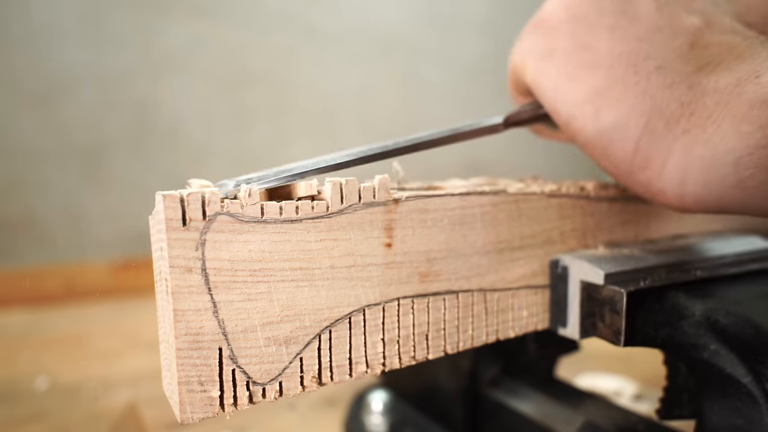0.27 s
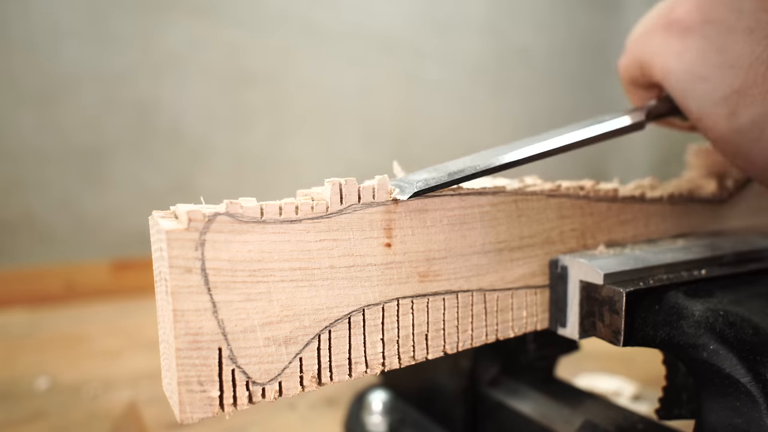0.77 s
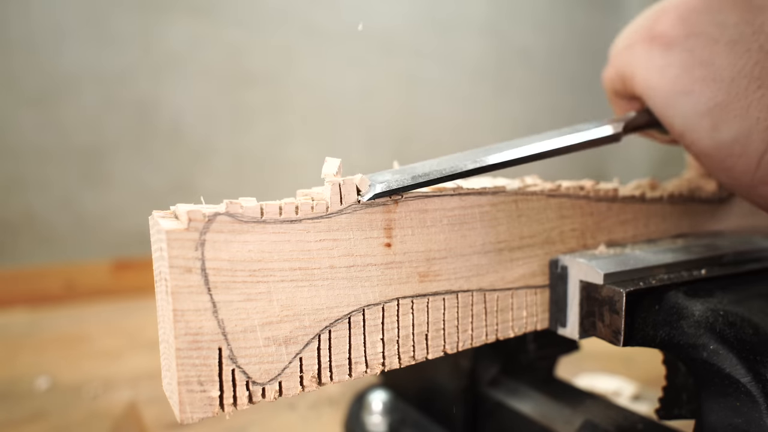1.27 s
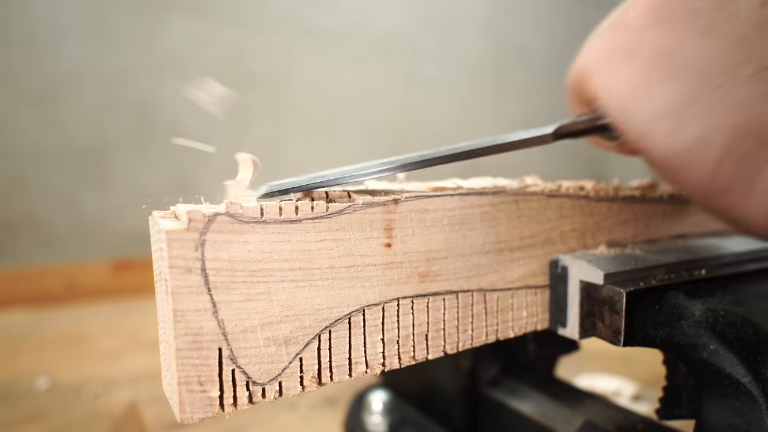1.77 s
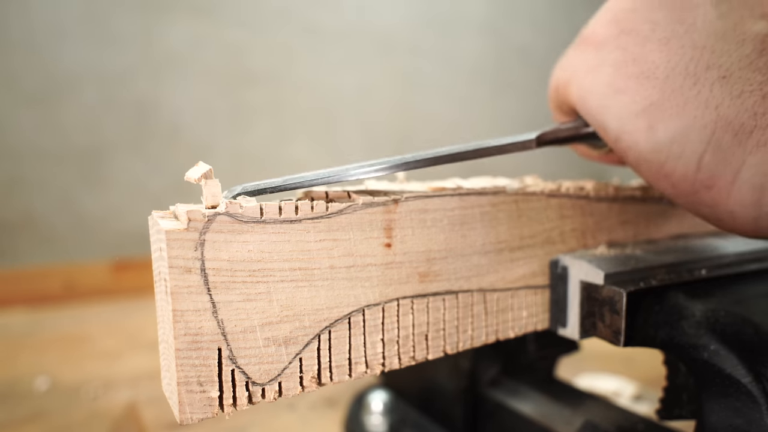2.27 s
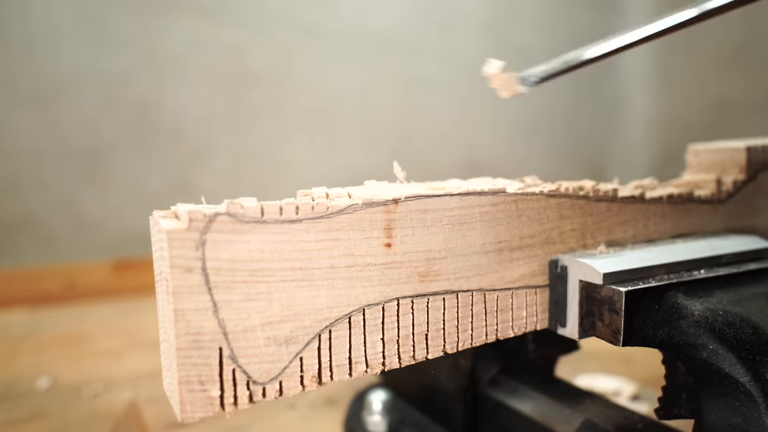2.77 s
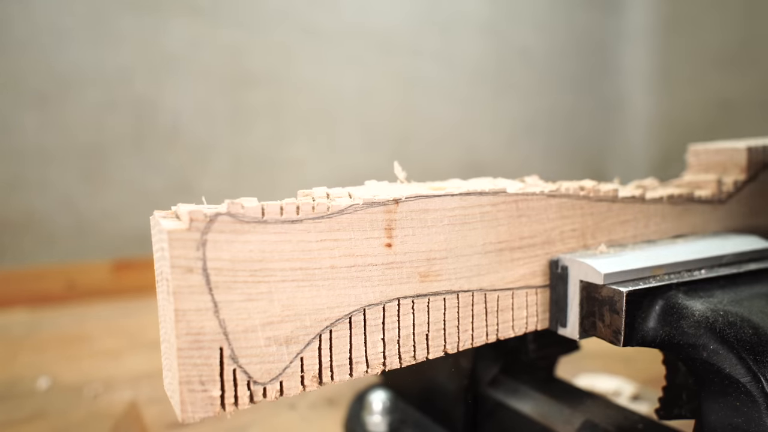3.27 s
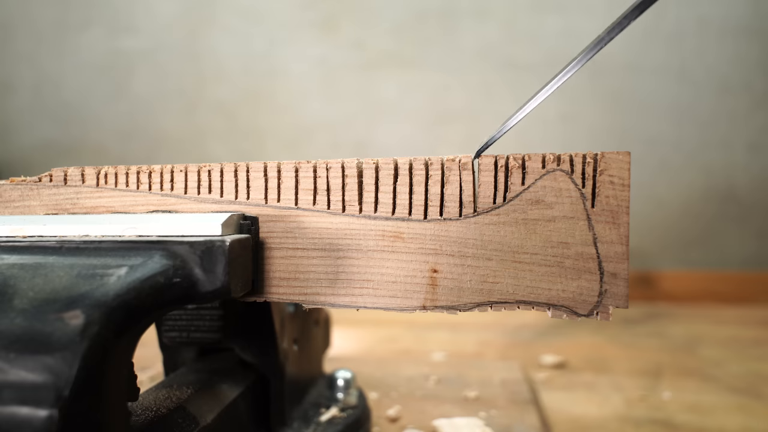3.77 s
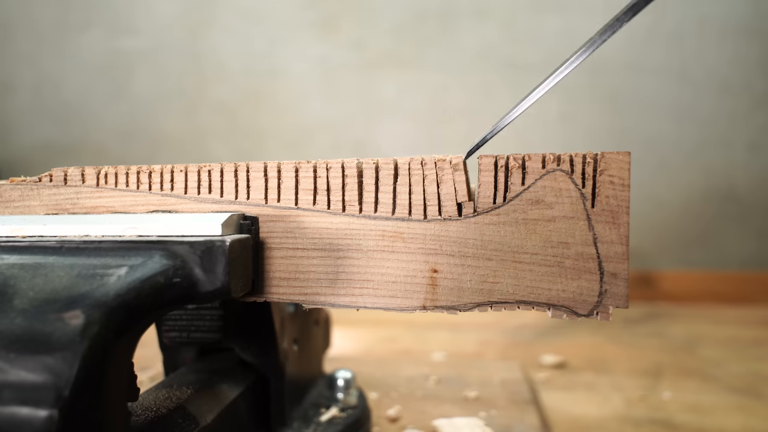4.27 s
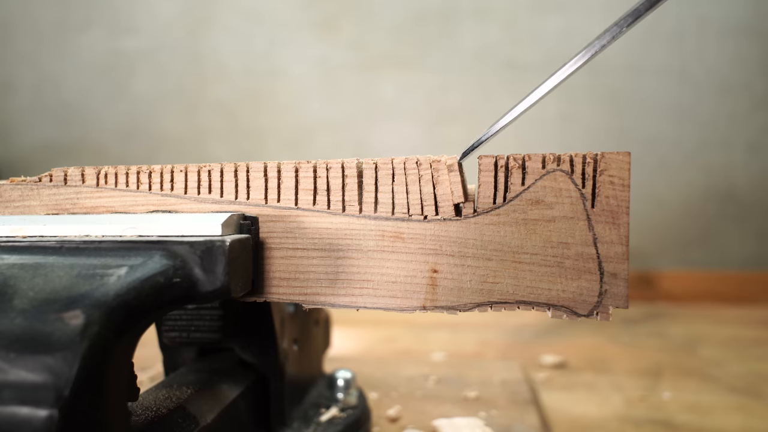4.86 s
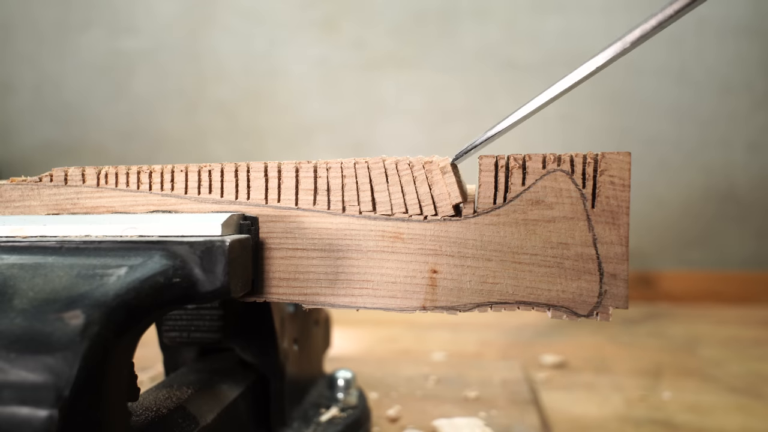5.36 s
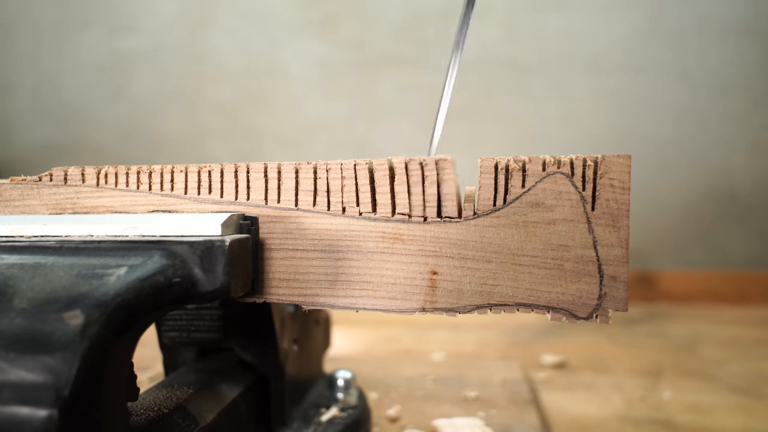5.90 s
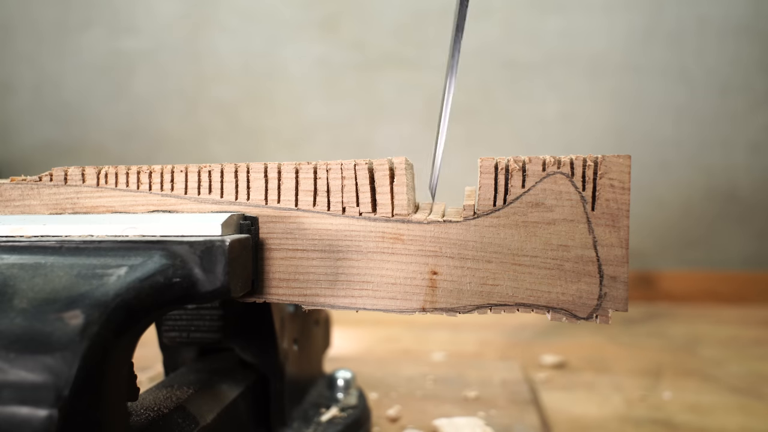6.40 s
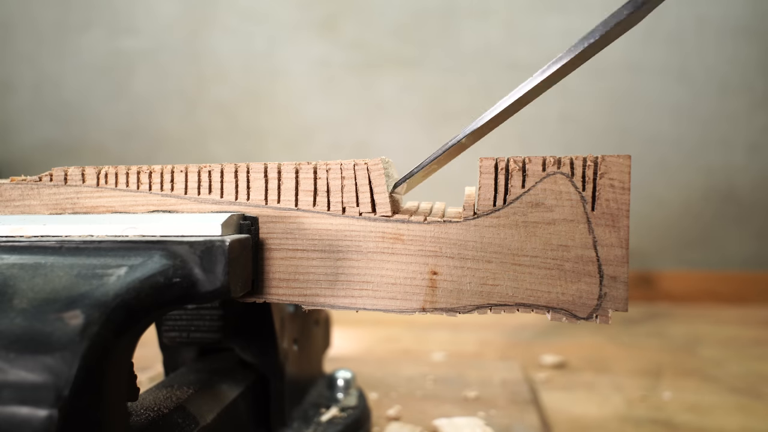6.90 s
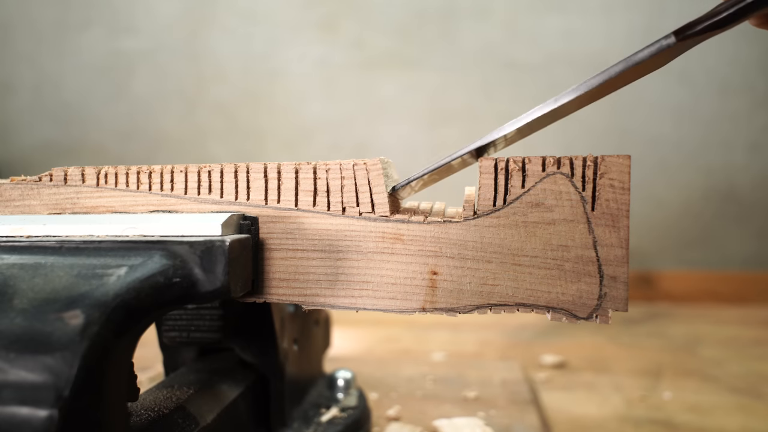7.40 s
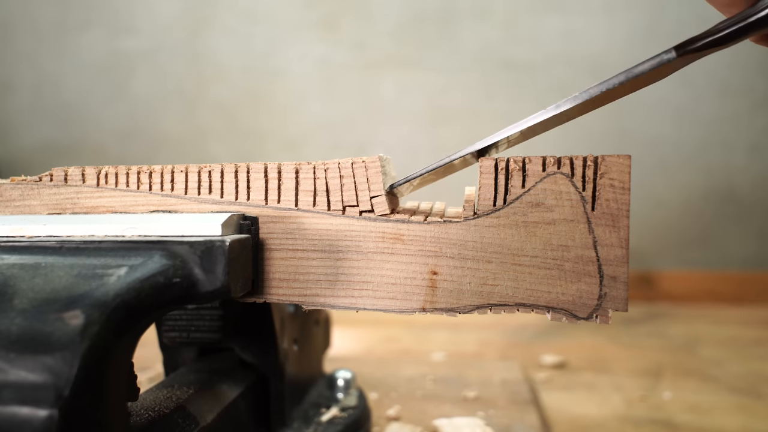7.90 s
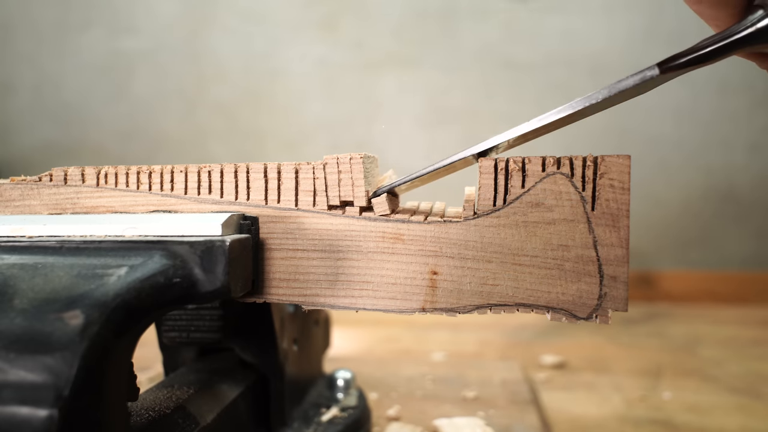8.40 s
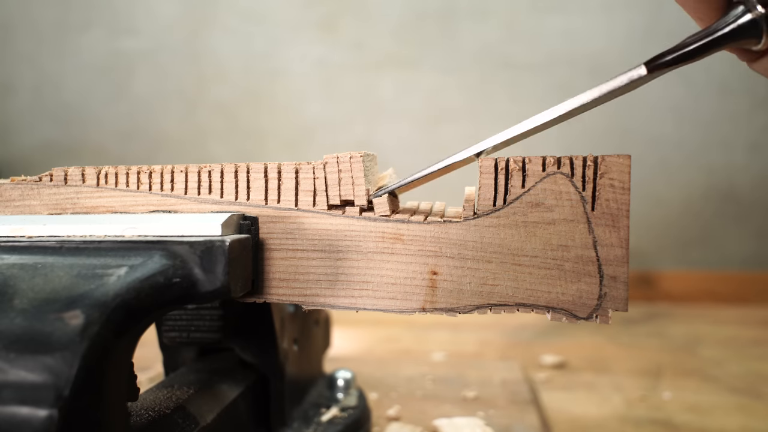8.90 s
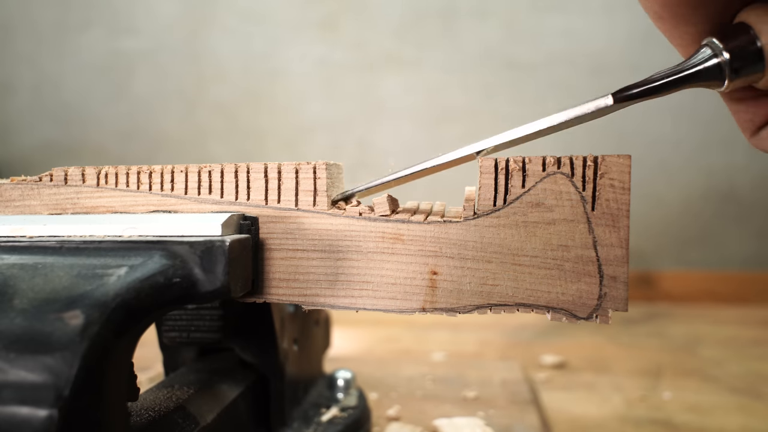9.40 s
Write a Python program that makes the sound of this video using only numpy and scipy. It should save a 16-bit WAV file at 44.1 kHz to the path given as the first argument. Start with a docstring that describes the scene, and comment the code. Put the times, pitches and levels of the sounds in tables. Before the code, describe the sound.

In a quiet workshop, brief scrapes of a blade on wood lead into five evenly spaced hammer blows on a chisel. After a pause, seven brighter blows follow, then loud snapping chips and gritty prying, then eight final blows. Each strike cracks sharply, splits fibres, rings briefly and booms through the bench. The close microphone overloads on the peaks.

```python
"""Chiselling at the bench vise

Over low workshop air, a blade pries and scrapes (rough noise) and chips snap off (short bursts with a pitch).
Then a steel hammer drives a chisel through the sawn teeth of a wooden blank, in three quick runs.
Each blow layers a crack, splitting fibres, ringing steel, a booming bench and a diffuse room tail.
The close microphone overloads: whatever goes beyond full scale is clipped flat."""
import sys
import numpy as np
from scipy import signal
from scipy.fft import rfft, irfft, next_fast_len
from scipy.io import wavfile
from scipy.ndimage import map_coordinates

SR = 44100
rng = np.random.default_rng(int(sys.argv[2]) if len(sys.argv) > 2 else 0)


def bounce(signal):
    """Save signal as a 16-bit WAV file at the path given by the first command-line argument."""
    frames = np.transpose(np.atleast_2d(signal))
    limited = np.clip(frames, -1, 1)
    pcm = np.round(limited * 32767).astype(np.int16)
    wavfile.write(sys.argv[1], SR, pcm)


N = 425565
# the time base of one sound event, three quarters of a second
T = np.arange(SR * 3 // 4) / SR

# workshop air spectrum: f/Hz, density/dB
AIR_SPECTRUM = [(12, -32.5), (20, -2.5), (58, 2.5), (138, -17.5), (222, -16.5), (718, -27.5), (873, -24),
                (1000, -27), (16000, -42.5)]
# workshop reverberation: f/Hz, t60/s
ROOM_DECAY = [(60, 0.54), (250, 0.34), (800, .28), (3000, 0.32), (6000, 0.34), (13000, .22)]
# moments at which every sound but the air is cut off: t/s
CUTOFFS = [0.515, 6.94]

# blade and loose chips scraping along the sawn teeth, levels before each layer's trim:
# t/s, length/s, rasp/dB, hiss/dB, rumble of the blank/dB
SCRAPES = [(0.0, 0.011, -33, -39, -36), (0.047, 0.023, -34.5, -38, -41), (0.169, 0.036, -36.5, -38, -39),
           (0.276, 0.15, -39.5, -47.5, -35.5), (0.495, 0.008, -39, -50, -28.5),
           (2.105, 0.04, -38.5, -43.5, -54), (2.199, 0.26, -60, -62.5, -57.5),
           (2.503, 0.048, -53.5, -60, -66), (5.989, 0.065, -52, -61, -28), (6.39, 0.037, -23, -22.5, -25.5),
           (6.575, 0.068, -36.5, -48, -29.5), (6.748, 0.042, -27, -45, -45),
           (6.768, 0.041, -24.5, -54, -35), (6.84, 0.031, -18.5, -27, -36), (9.031, 0.031, -20, -17, -33)]
# spectra of the scrape layers: f/Hz, density/dB
RASP_SPECTRUM = [(200, -31), (600, -7.5), (900, -2), (1500, 2), (3200, 0.5), (5500, -20), (10000, -25),
                 (16000, -79.5)]
HISS_SPECTRUM = [(1000, -49.5), (4000, 8), (6500, 0.5), (10000, -15.5), (16000, -26)]
RUMBLE_SPECTRUM = [(40, 8.5), (100, 2.5), (150, 6.5), (200, -3.5), (320, -0.5), (500, -2), (750, -19),
                   (2000, -35)]

# chips snapping off under the prying blade; knock is relative to level, treble is a shelf boost:
# t/s, level/dB, knock/dB, treble/dB, pitch f/Hz
CHIPS = [(0.048, -16.5, -42.5, -15, 1850), (0.17, -33.5, -1, 17.5, 9200), (2.087, -33, -45, -18, 3900),
         (2.201, -32, -41, 1.5, 1164), (2.507, -42, -25, -28, 6760), (2.893, -46.5, -30.5, -25, 3470),
         (5.968, -21.5, -38, -28, 2940), (5.993, -20, -5.5, -13, 1024), (6.04, -4.5, -24.5, -8, 2860),
         (6.047, -7, -28.5, -14, 3140), (6.175, -4, -25, -34, 3110), (6.242, -9, -31, 10, 6600),
         (6.393, -7, -42, -9, 2970), (6.584, -4, -33, -4.5, 3900), (6.772, -8.5, -36, -25, 2130),
         (6.901, -13.5, -40, 3.5, 3340)]
# chip colour: f/Hz, density/dB
CHIP_SPECTRUM = [(100, -24), (600, -9), (1400, -4.5), (3200, -1), (6000, 1.5), (10000, -6.5), (16000, -15)]
# dull taps as tool and loose chips settle after a blow: t/s
TAPS = [5.546, 5.931, 7.707, 8.268, 8.585]
# modes of the blank when it is knocked: f/Hz, level/dB, t60/s
BLANK_MODES = [(146, -6.5, 0.37), (306.8, -2, 0.1), (474, -2.5, 0.16), (547, -8.5, 0.1), (558, -7.5, 0.17)]

# hammer blows; treble is a shelf boost on the splintering, ring is relative to level:
# t/s, level/dB, splinter treble/dB, chisel ring/dB, strongest ring f/Hz
BLOWS = [(0.6064, -27, -10.5, -15.5, 3430), (0.9032, -22.5, -5.5, -6.5, 6620),
         (1.2035, -26.5, -3, -12.5, 1860), (1.5062, -23.5, -3.5, -13, 3120), (1.8109, -28, -19.5, 5, 4600),
         (3.6825, -27.5, 6.5, -7, 4720), (4.0258, -21, 8, -11.5, 4400), (4.3622, -23, 4, -14, 2120),
         (4.688, -25.5, 7, -13.5, 2060), (5.0191, -22, 3.5, -17.5, 4460), (5.3648, -21.5, -5, -9, 4520),
         (5.713, -20.5, -3.5, -10, 3030), (7.1574, -25, -10, -11.5, 3360), (7.4639, -24, -5.5, -20.5, 3810),
         (7.7756, -19, 4.5, -15.5, 6650), (8.095, -18, -2.5, -25.5, 4220), (8.3978, -21.5, 0.5, -10, 2760),
         (8.74, -25, -9.5, -14, 4350), (9.0544, -22, 5.5, -13.5, 2960), (9.3744, -20.5, -5, -7, 3080)]
# splintering wood: f/Hz, density/dB
SPLINTER_SPECTRUM = [(30, -19.5), (150, 1), (450, 6), (750, 3.5), (1400, 1.5), (2200, 2), (3000, 0.5),
                     (5000, -5.5), (7000, -10.5), (10000, -15.5), (16000, -22)]
# the chisel's modes: f/Hz, width/Hz, level/dB
CHISEL_MODES = [(1440, 37, 11.5), (3110, 130, 14), (4640, 300, 10), (6470, 200, 8.5), (8700, 230, 11.5)]
# modes of bench and vise: f/Hz, t60/s, level/dB as first clamped, level/dB with the blank turned round
BENCH_MODES = [(55, 0.41, -3.5, 2), (71.7, 0.32, 6.5, 2.5), (101, 0.33, -3.5, -2.5), (117, 0.24, -10, -0.5),
               (143.3, 0.23, 8.5, -1), (172, 0.12, -10, 2.5), (221, 0.16, -8.5, 7), (299.5, 0.24, -7.5, -5),
               (429.3, 0.33, 1.5, -2.5), (459.5, 0.28, -5.5, -5), (512, 0.33, -21, -6),
               (603, 0.16, -15.5, -18.5)]

# every stroke bites at once, eases off and lets go; the blank follows more slowly
BITE_S, EASE_DB_PER_S, RELEASE_T60_S = 0.001, 35.5, 0.12
RUMBLE_RISE_S, RUMBLE_T60_S = 0.019, 0.44
TAP_DB, TAP_KNOCK_DB, TAP_TREBLE_DB, TAP_HZ = -21.5, -25.5, -43.5, 1175
# the blank is turned round in the vise at this time
TURNED_S = 3.4
# the crack is low as the blank is first clamped, and higher once it is turned round
CRACK_HZ, TURNED_CRACK_HZ, CRACK_SPREAD = 1160, 2747, 0.1
# a tooth splits a moment after the edge bites, later under a weak blow (s, log share per dB, log spread)
SPLIT_S, SPLIT_PER_DB, SPLIT_SPREAD = 0.0038, 0.12, 0.16
# bench and vise take up a usual blow at these levels, and only a share of each dB beyond it
USUAL_DB, BENCH_SHARE = -23.5, 0.34
THUMP_DB, TURNED_THUMP_DB, KNOCK_DB, TURNED_KNOCK_DB = -16, -14.5, -15, -19
# the band limit of the finished sound
TOP_HZ = 16100


def amp(db):
    """Decibels to gain."""
    return 10 ** (np.asarray(db) / 20)


def unit(x):
    """x at rms 1."""
    return x / np.sqrt(np.mean(x ** 2) + 1e-20)


def along(points, hz):
    """A table of frequency and value, read on a log frequency axis."""
    f, v = np.transpose(points)
    return np.interp(np.log(hz + 1), np.log(f + 1), v)


def filtered(x, gain):
    """x shaped by a gain that depends on frequency."""
    padded = next_fast_len(len(x) + 8192)
    spectrum = rfft(x, padded) * gain(np.fft.rfftfreq(padded, 1 / SR))
    return irfft(spectrum, padded)[:len(x)]


def shelf(hz, corner_hz):
    """0 below the corner, 1 above it."""
    return hz ** 4 / (hz ** 4 + corner_hz ** 4)


def bump(hz, centre, width):
    """The power shape of a resonance, 1 at its centre."""
    return 1 / (1 + (2 * (hz - centre) / width) ** 2)


def wobble(x):
    """A random curve of straight lines, with one knot for each unit of x."""
    return map_coordinates(rng.standard_normal(int(x[-1]) + 2), [x], order=1)


def fade(t60):
    """An exponential decay, 60 dB down after t60 seconds."""
    return np.exp(-np.log(1000) * T / max(t60, 1e-4))


def ring(hz, t60):
    """One struck mode: a dying sine."""
    return np.sin(2 * np.pi * hz * T) * fade(t60)


def noise(spectrum, size):
    """Coloured noise of rms 1."""
    return unit(filtered(rng.standard_normal(size), lambda hz: amp(along(spectrum, hz))))


def burst(t60, clump_db=4, clump_rate=1400):
    """A dying burst of tiny fractures that come in clumps, white in colour."""
    clumps = amp(clump_db * wobble(T * clump_rate))
    return unit(clumps * rng.standard_normal(len(T))) * fade(t60)


def add(track, s, sound):
    """Lay a sound into the track from time s, up to the next cutoff."""
    start = max(round(s * SR), 0)
    later_cutoffs = [round(cutoff * SR) for cutoff in CUTOFFS if cutoff > s]
    end = min(later_cutoffs + [N, start + len(sound)])
    track[start:end] += sound[:end - start]


def workshop_air():
    """The workshop's low, quiet air: steady coloured noise."""
    return amp(-60.5) * noise(AIR_SPECTRUM, N)


def workshop(build_s=0.0059):
    """The room's answer to a click, of unit energy: a new diffuse tail that builds up, then dies by pitch."""
    hz, t, z = signal.stft(rng.standard_normal(len(T)), SR, nperseg=256)
    decay = np.exp(-np.log(1000) * t / along(ROOM_DECAY, hz)[:, None])
    tail = signal.istft(z * decay, SR, nperseg=256)[1][:len(T)]
    # the tail builds up as the walls are reached
    tail = tail * (1 - np.exp(-T / build_s))
    return tail / np.linalg.norm(tail)


def stroke(length, rise, t60):
    """The pressure of one stroke: it rises, eases off while it is held, and dies away."""
    held = amp(-EASE_DB_PER_S * T) * (1 - np.exp(-T / max(rise, 1e-4)))
    return held * np.exp(-np.log(1000) * np.maximum(T - length, 0) / max(t60, 1e-4))


def crumbs(rate=70, spread_db=4):
    """Sparse clicks of uneven size as fibres break off under the edge, white in colour."""
    return (rng.random(len(T)) < rate / SR) * amp(spread_db * rng.standard_normal(len(T)))


def scraping(rasp_db=-5, hiss_db=-6, rumble_db=-1, catch_db=5, catch_rate=450, room_db=-3, teeth_db=3.5,
             crumb_db=14):
    """The edge catches and slips on the fibres hundreds of times a second, and the blank rumbles under it."""
    track = np.zeros(N)
    for s, length, rasp, hiss, rumble in SCRAPES:
        catches = unit(amp(catch_db * wobble(T * catch_rate)))
        rasping = amp(rasp + rasp_db) * noise(RASP_SPECTRUM, len(T))
        hissing = amp(hiss + hiss_db) * noise(HISS_SPECTRUM, len(T))
        rub = catches * (rasping + hissing) + amp(hiss + crumb_db) * crumbs()
        rub = stroke(length, BITE_S, RELEASE_T60_S) * rub
        # the teeth under the edge resonate, and the colour shifts as it passes from one to the next
        here, there = [filtered(rub, lambda hz: amp(teeth_db * wobble(hz / 150))) for _ in range(2)]
        share = (1 + np.tanh(2 * wobble(T * 18))) / 2
        rub = share * here + (1 - share) * there
        echo = signal.fftconvolve(rub, workshop())[:len(T)]
        body = amp(rumble + rumble_db) * noise(RUMBLE_SPECTRUM, len(T))
        body = stroke(length, RUMBLE_RISE_S, RUMBLE_T60_S) * body
        add(track, s, rub + amp(room_db) * echo + body)
    return track


def blank(scatter_db=1.0, detune=0.031):
    """The blank knocked in the vise: a few modes, slightly different in pitch and level each time."""
    return sum(amp(level + rng.normal(0, scatter_db)) * ring(f * (1 + rng.normal(0, detune)), t60)
               for f, level, t60 in BLANK_MODES)


def chips(snap_db=2, snap_t60=0.012, tone_db=-10, tone_t60=0.027, room_db=9, ripple_db=4.5, lag_s=0.0015,
          tick_db=-14, tick_t60=0.01, tick_ahead_s=0.006):
    """A chip snaps with a short pitch, or settles with a dull tap, and the blank knocks in the vise."""
    track = np.zeros(N)
    taps = [(s, TAP_DB, TAP_KNOCK_DB, TAP_TREBLE_DB, TAP_HZ) for s in TAPS]
    for s, db, knock_db, treble_db, pitch in CHIPS + taps:
        # small random resonances, drawn afresh for each tick and each snap
        colour = lambda hz: amp(along(CHIP_SPECTRUM, hz) + treble_db * shelf(hz, corner_hz=5500)
                                + ripple_db * wobble(hz / 220))
        # the first fibre ticks just before the rest let go
        tick = filtered(burst(tick_t60), colour)
        add(track, s + lag_s - tick_ahead_s, amp(db + tick_db) * tick)
        snap = filtered(amp(snap_db) * burst(snap_t60) + amp(room_db) * workshop(), colour)
        tone = amp(tone_db) * ring(pitch, tone_t60)
        knock = amp(knock_db) * blank()
        add(track, s + lag_s, amp(db) * (snap + tone + knock))
    return track


def bench(s, thump_db, knock_db, swell_s=0.033, scatter_db=2.5, sway_db=-25, sway_hz=50, shudder_db=-2):
    """The heavy bench takes up the blow slowly and booms; the vise and blank knock at once."""
    turned = s > TURNED_S
    thump = amp(thump_db) * (1 - np.exp(-T / swell_s))
    out = np.zeros(len(T))
    for k, (hz, t60, first_db, turned_db) in enumerate(BENCH_MODES):
        drive = thump if hz < 250 else amp(knock_db)
        db = (turned_db if turned else first_db) + rng.normal(0, scatter_db)
        mode = ring(hz * (1 + rng.normal(0, 0.012)), t60)
        out += (-1) ** k * amp(db) * drive * mode  # neighbouring modes start in opposite phase
    # the whole frame goes on trembling after the boom, less before the blank is turned
    sway = noise([(10, -4), (30, 0), (sway_hz, 0), (75, -10), (140, -24), (400, -60), (2000, -120)], len(T))
    shudder = amp(shudder_db - (0 if turned else 12)) * fade(0.32) + amp(sway_db) * fade(3.0)
    return out + thump * shudder * sway


def hammer(crack_db=39, crack_t60=0.0063, bite_db=32, bite_t60=0.016, split_db=31, split_t60=0.014, room_db=43,
           lead_db=19, lead_width_hz=150, steel_db=-12.5, steel_t60=0.27, steel_rough=0.43, blank_db=-1):
    """Every blow: a hard crack, fibres that give way a moment later, the chisel's ring and the shaken bench."""
    track = np.zeros(N)
    for s, db, treble_db, ring_db, ring_hz in BLOWS:
        if s > TURNED_S:
            pitch, thump_db, knock_db = TURNED_CRACK_HZ, TURNED_THUMP_DB, TURNED_KNOCK_DB
        else:
            pitch, thump_db, knock_db = CRACK_HZ, THUMP_DB, KNOCK_DB
        harder_db = db - USUAL_DB
        pitch = pitch * np.exp(CRACK_SPREAD * rng.standard_normal())
        wait_s = SPLIT_S * np.exp(SPLIT_SPREAD * rng.standard_normal() - SPLIT_PER_DB * harder_db)
        # the hammer face on the handle: a few heavily damped modes
        crack = amp(crack_db) * sum(gain * ring(pitch * ratio, crack_t60)
                                    for ratio, gain in [(0.55, 0.49), (1, 0.92), (1.52, 0.54)])
        # the grip and the depth of the cut shift the chisel's modes a little and favour one of them
        modes = [(f * (1 + rng.normal(0, 0.0035)), width, amp(level + ring_db))
                 for f, width, level in CHISEL_MODES]
        modes.append((ring_hz, lead_width_hz, amp(lead_db + ring_db)))
        steel = lambda hz: np.sqrt(1 + sum(gain ** 2 * bump(hz, f, width) for f, width, gain in modes))
        # the more fibres snap, the brighter the break; the vise colours its low end
        vise_db = -(0.5 - BENCH_SHARE) * harder_db
        wood = lambda hz: amp(along(SPLINTER_SPECTRUM, hz) + treble_db * shelf(hz, corner_hz=3860)
                              + vise_db * bump(hz, 390, 410))
        # the sawn teeth have many small resonances, different for every cut
        teeth = lambda hz: amp(2 * wobble(hz / 90))
        # the edge bites at once, then the tooth splits off
        bite = amp(bite_db) * burst(bite_t60)
        split = amp(split_db) * np.pad(burst(split_t60), (round(wait_s * SR), 0))[:len(T)]
        fracture = bite + split + amp(room_db) * workshop()
        fracture = filtered(fracture, lambda hz: wood(hz) * steel(hz) * teeth(hz))
        # the steel sings on unevenly, wedged in the cut
        singing = amp(steel_db) * sum(gain * wood(f) * ring(f, steel_t60) for f, _, gain in modes)
        singing = singing * (1 + steel_rough * wobble(T * 110))
        shaking = bench(s, thump_db, knock_db) + amp(knock_db + blank_db) * blank()
        shaking = amp(BENCH_SHARE * harder_db) * shaking
        add(track, s, amp(db) * (crack + fracture + singing) + shaking)
    return track


def scene():
    """The work at the vise over the workshop's air."""
    return (workshop_air() + scraping() + chips() + hammer())[None]


def record(dry):
    """The overloaded input clips flat at full scale; a steep filter then removes what lies above TOP_HZ."""
    clipped = np.clip(dry[0], -1, 1)
    return filtered(clipped, lambda hz: 1 / (1 + (hz / TOP_HZ) ** 120))[None]


dry = scene()
out = record(dry)
bounce(out)
```